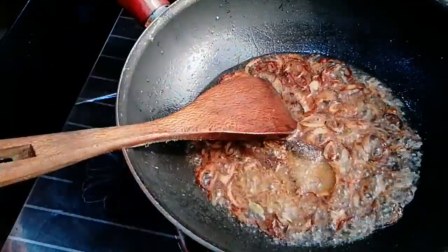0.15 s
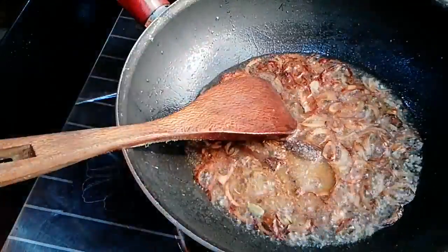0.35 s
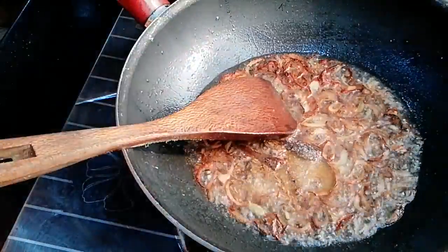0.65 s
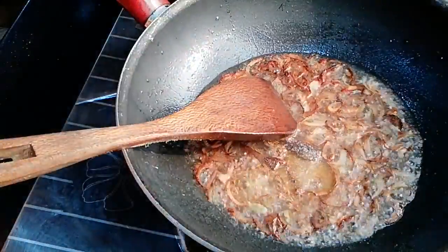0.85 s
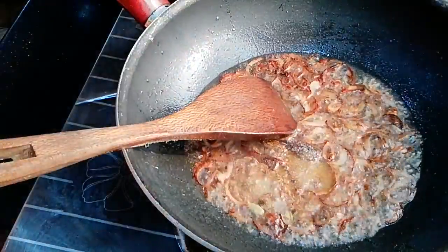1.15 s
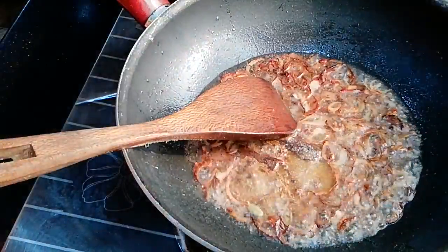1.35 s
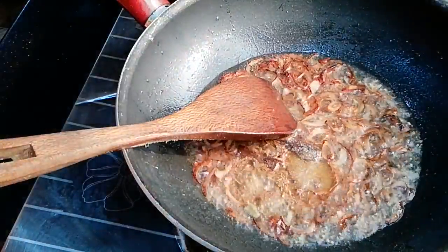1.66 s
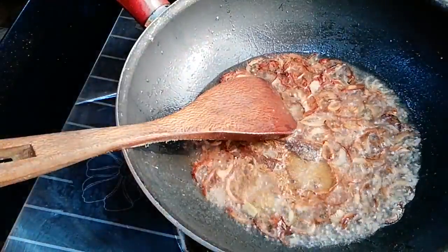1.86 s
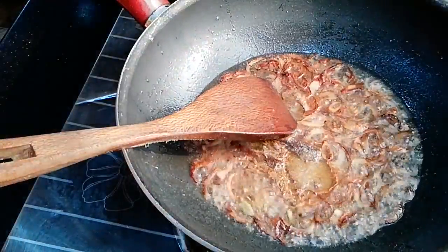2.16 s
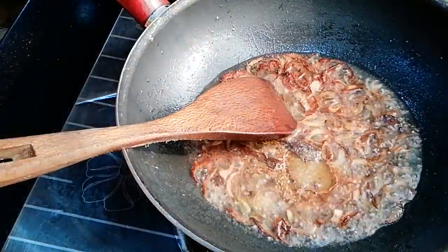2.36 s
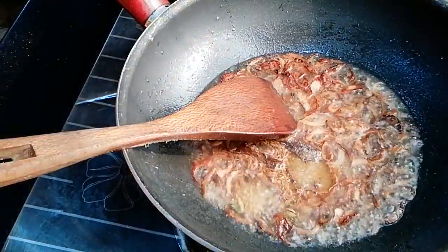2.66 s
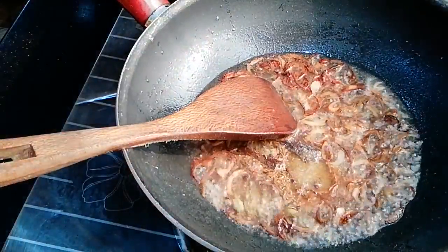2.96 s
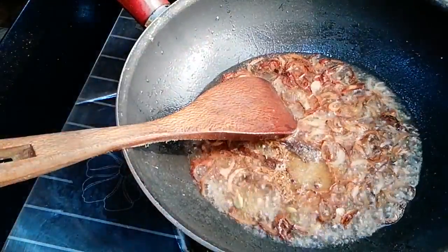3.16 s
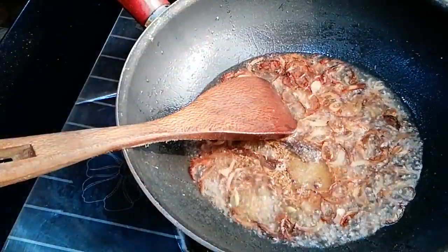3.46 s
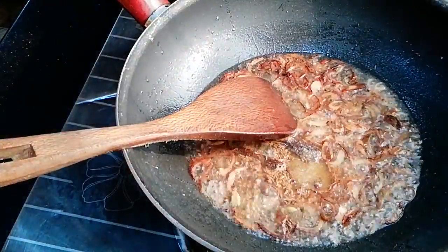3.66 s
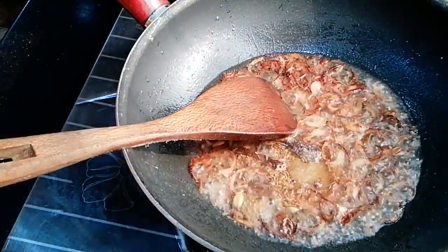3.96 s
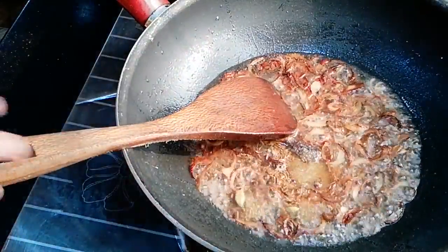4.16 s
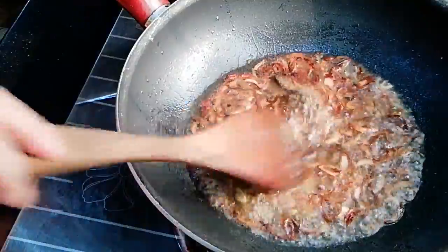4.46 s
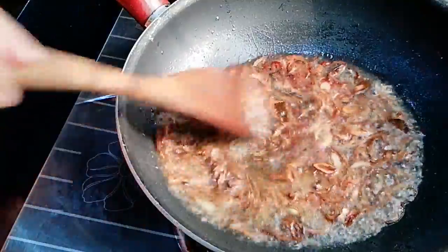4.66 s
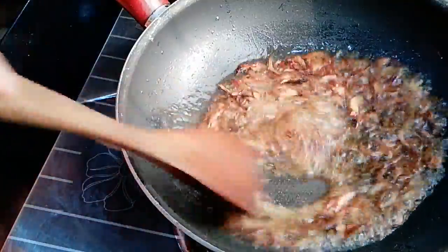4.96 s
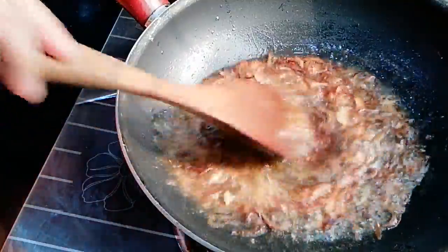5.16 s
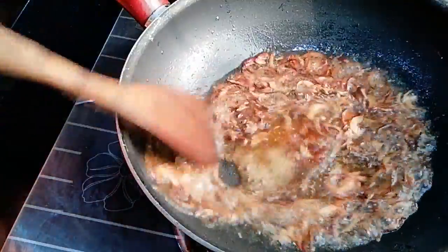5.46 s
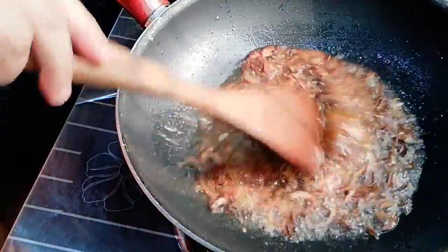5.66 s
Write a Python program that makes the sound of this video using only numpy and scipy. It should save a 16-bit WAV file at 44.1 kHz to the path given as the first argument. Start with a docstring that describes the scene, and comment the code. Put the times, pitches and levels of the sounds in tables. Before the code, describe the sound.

Close to the microphones, a wok sizzles and bubbles steadily, popping now and then over the low hum of a small kitchen. Early on, a plastic cup is put away slightly to the right, sliding and clattering briefly with a hollow, falling note. The boiling carries on alone until a wooden spatula scrapes gently through the onions three times, making the sizzle louder and brighter.

```python
"""A small kitchen with a low steady rumble, a pair of microphones on a wok of onions and spices.
They boil in a little water: thousands of tiny bubbles burst into a hiss, larger ones ring the bowl,
and a few spit. Early on a plastic cup is put away to one side: it scrapes, rattles and knocks home,
its hollow note falling. Later a spatula stirs and the hiss swells. Two soft bumps lie underneath."""
import sys
import numpy as np
from scipy import signal
from scipy.fft import rfft, irfft
from scipy.io import wavfile
from scipy.ndimage import uniform_filter1d

SR = 44100
rng = np.random.default_rng(int(sys.argv[2]) if len(sys.argv) > 2 else 0)


def put_to_file(sound):
    """Save the sound as 16-bit audio at rate SR, in the file named by the first command-line argument."""
    columns = np.atleast_2d(sound).T  # one column per channel
    safe = np.clip(columns, -1, 1)
    whole_steps = np.round(safe * 32767)
    wavfile.write(sys.argv[1], SR, whole_steps.astype(np.int16))


N = 255956
EDGE_HZ = 15900


def gain_of(db):
    """Decibels to gain."""
    return 10 ** (np.asarray(db) / 20)


def unit_rms(x):
    """Scales to rms 1."""
    return x / np.sqrt(np.mean(x ** 2) + 1e-20)


def since(start_s):
    """Seconds elapsed since a moment, zero before it."""
    return np.maximum(np.arange(N) / SR - start_s, 0)


def at_hz(points, hz):
    """Reads a spectrum on a log-frequency axis."""
    f, value = np.transpose(points)
    return np.interp(np.log(hz + 1), np.log(f), value)


def follow(points):
    """A curve in time, sample by sample."""
    return np.interp(since(0), *np.transpose(points))


def drift(span):
    """Random wander of rms 1 that changes within `span` samples."""
    wander = uniform_filter1d(rng.standard_normal(N), int(span), mode="wrap")
    return unit_rms(uniform_filter1d(wander - wander.mean(), int(span) // 3, mode="wrap"))


def add(mix, s, sound):
    """Adds a sound at time s."""
    part = mix[..., round(s * SR):][..., :sound.shape[-1]]
    part += sound[..., :part.shape[-1]]


def convolve(x, response):
    """Plays x through a response, one row a channel."""
    return signal.oaconvolve(np.atleast_2d(x), np.atleast_2d(response), axes=1)[:, :N]


def colour(x, points, size=4096):
    """Plays x through a causal filter of energy 1 with the given spectrum."""
    log_gain = np.log(gain_of(at_hz(points, abs(np.fft.fftfreq(size, 1 / SR)))))
    taps = np.fft.ifft(np.exp(np.conj(signal.hilbert(log_gain)))).real
    return convolve(x, taps / np.linalg.norm(taps))


def band(x, lo_hz, hi_hz, order):
    """Causal band-pass."""
    return signal.sosfilt(signal.butter(order, [lo_hz, hi_hz], "bandpass", fs=SR, output="sos"), x)


def resonate(x, hz, width):
    """A resonance that can follow a moving pitch; a unit click rings with height 1."""
    turn = np.exp(2j * np.pi * np.cumsum(hz * np.ones(N)) / SR)
    pole = np.exp(-np.pi * width / SR)
    return (turn * signal.lfilter([1], [1, -pole], x / turn + 1e-18)).imag


def burst(decay_s, rise_s, size=2048):
    """A contact and its scatter of near echoes, different at each microphone."""
    t = np.arange(size) / SR
    return np.exp(-t / decay_s) * (1 - np.exp(-t / rise_s)) * rng.standard_normal((2, size))


# The room around the microphones. Each row: frequency in Hz, seconds to die away by 60 dB.
KITCHEN_DECAY = [(300, 0.4), (1000, 0.4), (3000, 0.32), (8000, 0.35), (15000, 0.11)]
def kitchen(x, wet_db):
    """Adds a diffuse tail, different at each microphone, whose treble dies first."""
    hz, t, noise = signal.stft(rng.standard_normal((2, SR // 2)), SR, nperseg=256)
    decay = gain_of(-60 * t / at_hz(KITCHEN_DECAY, hz)[:, None])
    onset = 1 - np.exp(-t / 0.0011)
    tail = signal.istft(noise * decay * onset, SR, nperseg=256)[1]
    return x + gain_of(wet_db) * convolve(x, tail / np.linalg.norm(tail[0]))


def stirred(start_s=4.494, swell_s=0.27):
    """Stirring wets hot steel: how far it has roused the boil, 0 to 1."""
    return 1 - np.exp(-since(start_s) / swell_s)


def boil_db(recovery_db=2, recovery_s=2, stir_db=5.5):
    """Growth of the boil as the heat returns after fresh water, and with stirring."""
    return recovery_db * (1 - np.exp(-since(0) / recovery_s)) + stir_db * stirred()


def foam(fine_db, per_s=4600, spread_db=3.0, grain_width_hz=2500, clump_db=0.82, spurt_db=1.1, bands=13):
    """Bubbles of every pitch burst in loose clumps; each is a snap, echoes off the steel and some room."""
    popping = rng.random(N) < per_s / SR
    pitch = rng.uniform(0, EDGE_HZ, N)
    size = np.minimum(rng.exponential(1, N), 5)
    energy = popping * gain_of(spread_db * size + clump_db * drift(940)) ** 2
    t = np.arange(SR // 6) / SR
    # Snap, steel and room at the microphones. Each row: weight of energy, decay in seconds.
    paths = [(0.35, 0.000047), (0.41, 0.0011), (1.2, 0.016)]
    arrival = sum(weight * np.exp(-t / s) / s for weight, s in paths)
    hz, out = np.fft.rfftfreq(N, 1 / SR), np.zeros((2, N))
    noise = rfft(rng.standard_normal((2, N)))
    step = EDGE_HZ / (bands - 1)
    for centre in np.arange(bands) * step:
        power = abs(convolve(energy * np.exp(-((pitch - centre) / grain_width_hz) ** 2), arrival))
        noise_band = irfft(noise * np.maximum(1 - abs(hz - centre) / step, 0), N)
        # bubbles of one size come in spurts; the finest ones lift the top of the range
        lift_db = spurt_db * drift(1340) + fine_db * np.clip((centre - 7000) / 6000, 0, 1)
        out += noise_band * unit_rms(np.sqrt(power)) * gain_of(lift_db)
    return out


# Bursting foam in the wok. Each row: frequency in Hz, relative density in dB.
HISS_SPECTRUM = [(400, -31), (900, -14), (1700, -4.5), (2450, -6), (3150, -2), (4400, -1.5), (5700, -1.5),
                 (7200, -2), (8000, 1.5), (8700, 0.5), (9600, -0.4), (11000, -6.5), (13000, -11.5),
                 (15800, -16.5)]
def hiss(level_db=-39, waver_db=0.39, waver_s=0.11, flash_s=4.66, rise_s=0.082, fall_s=0.12):
    """The foam's sizzle wavers a little; stirring swells it and brings a brief flash of treble."""
    t = since(flash_s)
    flash = np.minimum(t / rise_s, 1) * np.exp(-np.maximum(t - rise_s, 0) / fall_s)
    fizz = colour(foam(fine_db=3 * stirred() + 10.5 * flash), HISS_SPECTRUM)
    return gain_of(level_db + boil_db() - 0.1 * flash + waver_db * drift(waver_s * SR)) * unit_rms(fizz)


# Resonances of the wok's bowl. Each row: pitch in Hz, width in Hz, relative gain in dB.
BOWL_MODES = [(432, 7.5, -36), (684, 61, -6.5), (876, 117, -10), (1194, 103, -0.5), (1440, 193, -5),
              (1930, 224, -8.5)]
# The larger bubbles slowly come and go. Each row: time in seconds, level in dB.
GURGLE_LEVELS = [(.4, -47.5), (.7, -48), (2.0, -48.5), (2.6, -46.7), (4.15, -49.5), (4.55, -48),
                 (5.0, -47.5), (5.25, -44.5), (5.8, -48.5)]
def gurgle(per_s=900, spread_db=3.0, crossfeed=0.18, surge_db=1.7):
    """Larger bubbles come in little surges and ring the air in the bowl of the wok."""
    popping = rng.random((2, N)) < per_s / SR
    size = np.minimum(rng.exponential(1, (2, N)), 4)
    clicks = popping * gain_of(spread_db * size) * rng.choice([-1, 1], (2, N))
    clicks = kitchen(clicks, wet_db=-0.5)
    clicks = clicks + crossfeed * clicks[::-1]
    # each surge favours other resonances, according to where it breaks
    ring = sum((-1) ** k * gain_of(db + surge_db * drift(2100)) * width * resonate(clicks, hz, width)
               for k, (hz, width, db) in enumerate(BOWL_MODES))
    return gain_of(follow(GURGLE_LEVELS)) * unit_rms(ring)


# The kitchen's room tone. Each row: frequency in Hz, relative density in dB.
RUMBLE_SPECTRUM = [(20, -14), (48, -12.5), (66, -9.5), (80, -7), (98, -0.5), (120, -4), (170, -8),
                   (210, -6.5), (260, -10.5), (350, -9), (500, -14.5), (900, -12), (2000, -33)]
# How alike it is at the two microphones. Each row: frequency in Hz, correlation from -1 to 1.
RUMBLE_LIKENESS = [(60, 1), (160, 1), (260, 0.94), (420, -0.15), (750, -0.44)]
def rumble(level_db=-48.5):
    """Steady low noise of stove and room, its bass nearly the same at both microphones."""
    hz = np.fft.rfftfreq(N, 1 / SR)
    left, other = rfft(rng.standard_normal((2, N)))
    likeness = at_hz(RUMBLE_LIKENESS, hz)
    right = likeness * left + np.sqrt(1 - likeness ** 2) * other
    spectrum = np.array([left, right]) * gain_of(at_hz(RUMBLE_SPECTRUM, hz))
    return gain_of(level_db) * unit_rms(irfft(spectrum, N))


# The main spits from the wok. Each row: start in seconds, level in dB.
LOUD_SPITS = [(.1345, -19), (.4825, -17.5), (1.0045, -20.5), (1.4162, -18.5), (1.843, -18), (1.912, -19),
              (1.9845, -19), (2.385, -20), (2.4515, -25), (3.3793, -21), (3.6509, -17), (3.757, -17),
              (3.982, -15), (4.3458, -16), (4.6234, -15), (4.913, -12), (4.944, -16), (5.163, -20),
              (5.282, -13), (5.4018, -11)]
# The snap of one spit. Each row: frequency in Hz, relative density in dB.
SNAP_SPECTRUM = [(500, -32), (2000, -24), (4000, -8), (8500, 6.5), (11000, -2), (15500, -12)]
def spits(small_per_s=7, small_db=-22.5, spread_db=1, max_count=80):
    """Sharp spits stand out of the foam; the lesser ones come at random and grow with the boil."""
    out, lift_db = np.zeros((2, N)), boil_db()
    times = np.cumsum(rng.exponential(1 / small_per_s, max_count))
    levels = small_db + spread_db * rng.standard_normal(max_count)
    small = [(s, db + lift_db[int(s * SR)]) for s, db in zip(times, levels) if s < N / SR]
    for s, db in LOUD_SPITS + small:
        snap = burst(decay_s=.0011, rise_s=.0002)
        add(out, s, gain_of(db) * snap / abs(snap).max())
    return kitchen(colour(out, SNAP_SPECTRUM), wet_db=-4)


# Bumps, alike at both microphones. Each row: start in seconds, level in dB, pitch in Hz.
LOW_BUMPS = [(0.384, -40, 57.3), (5.06, -47, 42)]
def bumps(t60=.3, rise_s=.008):
    """Two soft bumps, each a very low tone that dies quickly."""
    t, out = np.arange(SR // 3) / SR, np.zeros(N)
    for s, db, hz in LOW_BUMPS:
        envelope = gain_of(db - 60 * t / t60) * (1 - np.exp(-t / rise_s))
        add(out, s, envelope * np.sin(2 * np.pi * hz * t))
    return out


# The cup knocks, off to one side. Each row: start in seconds, then ring, clack and crack levels in dB.
CUP_BLOWS = [(.7360, -28, -25, -48), (.7410, -18.5, -29.5, -49), (0.883, -32, -31, -52),
             (0.9168, -16.5, -33, -43), (1.022, -19, -23, -23), (1.0805, -21, -18, -14),
             (1.1079, -15, -16.5, -11), (1.1305, -3.5, -13, -14), (1.1342, -9.5, -20.5, -8.5),
             (1.1730, -12.5, -22.5, -20)]
def cup_blows(contact_s=.0042):
    """Each blow gives a push to the air under the cup, a dull clack and a sharp crack."""
    pushes, clacks, cracks = np.zeros(N), np.zeros((2, N)), np.zeros((2, N))
    for s, ring_db, clack_db, crack_db in CUP_BLOWS:
        add(pushes, s, gain_of([ring_db]))
        add(clacks, s, gain_of(clack_db) * burst(contact_s, rise_s=0.0006))
        add(cracks, s, gain_of(crack_db) * burst(contact_s, rise_s=0.0015))
    return pushes, clacks, cracks


# The cup slides between knocks. Each row: start in seconds, length in seconds, level in dB.
CUP_SLIDES = [(.742, 0.064, -50), (0.873, .10, -41), (1.016, 0.097, -31), (1.089, 0.054, -30.5)]
def cup_rubbing(bite_s=0.0088, ease_db_per_s=-33, release_s=0.019, grip_db=4.0):
    """Strength of the rubbing: each slide bites, eases off and lets go; the rim grips unevenly."""
    rub = np.zeros(N)
    for s, length, db in CUP_SLIDES:
        bite = np.minimum(since(s) / bite_s, 1)
        release = np.exp(-since(s + length) / release_s)
        rub += bite * gain_of(db + ease_db_per_s * since(s)) * release
    return rub * gain_of(grip_db * drift(100))


# The note of the air under the cup. Each row: time in seconds, pitch in Hz.
CUP_AIR_NOTE = [(.742, 870), (.755, 1420), (.78, 1530), (.92, 1640), (.98, 1600), (1.03, 1360),
                (1.09, 1220), (1.135, 930), (1.25, 930)]
def cup_air(pushes, rub, width_hz=150, hollow_db=-1):
    """Blows and rubbing ring the air under the cup; its note rises, then falls as the gap closes."""
    hz = follow(CUP_AIR_NOTE)
    hollow = resonate(rng.standard_normal(N), hz, width=160)
    hollow = unit_rms(resonate(hollow, hz, width=600))
    air = resonate(pushes, hz, width_hz) + gain_of(hollow_db) * rub * hollow
    return air * gain_of([[-2], [.5]])  # toward the right microphone


# The cup's plastic wall. Each row: pitch in Hz, relative gain in dB, seconds to die away by 60 dB.
SHELL_MODES = [(746, -1.5, 0.11), (855, -7, 0.44), (920, -2, .35), (970, 3, 0.54), (1210, -8, 0.6),
               (1317, 2.5, .25), (1620, 1, 0.14), (2580, 15, 0.062), (7640, 4, 0.014), (9600, -3, .015)]
def cup_shell(body, level_db=-4):
    """The shell rings on wherever the sliding note meets one of its modes."""
    ring = 0
    for hz, db, t60 in SHELL_MODES:
        width = np.log(1000) / np.pi / t60
        ring += gain_of(db + level_db) * 2 * np.pi * width / SR * resonate(body, hz, width)
    return ring


def cup_thud(start_s=1.174, level_db=-31, hz=573, width_hz=80):
    """The cup's last bounce thuds on the surface below."""
    t = since(start_s)
    return gain_of(level_db) * np.exp(-np.pi * width_hz * t) * np.sin(2 * np.pi * hz * t)


# The clack of a blunt contact and the crack of plastic. Each row: frequency in Hz, relative density in dB.
CLACK_SPECTRUM = [(300, -10), (600, 4), (1700, 2), (2050, -4.5), (2900, -1), (3600, 0), (5000, -22),
                  (15000, -17)]
CRACK_SPECTRUM = [(300, 0), (550, -12), (800, -16), (2000, -29), (4000, -8.5), (6000, -4), (7700, -0.5),
                  (8300, -6.5), (9400, -1.5), (11000, -9.5), (15500, -22)]
def cup(rasp_db=-14, scratch_db=-13):
    """The cup knocks and scrapes home, ringing its air, its shell and the kitchen."""
    pushes, clacks, cracks = cup_blows()
    rub = cup_rubbing()
    clacks += gain_of(rasp_db) * rub * rng.standard_normal((2, N))
    cracks += gain_of(scratch_db) * rub * rng.standard_normal((2, N))
    body = cup_air(pushes, rub) + colour(clacks, CLACK_SPECTRUM) + colour(cracks, CRACK_SPECTRUM)
    body = band(body, 940, 20000, order=4)  # so small a thing radiates no bass
    return kitchen(body + cup_shell(body) + cup_thud(), wet_db=-3.0)


# The spatula in the wok. Each row: start in seconds, length in seconds, level in dB.
SPATULA_STROKES = [(4.553, .2, -46.5), (4.95, 0.29, -45.5), (5.327, 0.36, -48)]
# What its scraping rings. Each row: pitch in Hz, width in Hz, relative gain in dB.
SCRAPE_MODES = [(1170, 230, -6), (1510, 170, 1.5), (1850, 190, 1)]
def spatula(slip_db=3):
    """Wood slips unevenly over wet steel and rings the bowl; each stroke speeds up and slows in an arch."""
    speed = sum(gain_of(db) * np.sin(np.pi * np.minimum(since(s) / length, 1))
                for s, length, db in SPATULA_STROKES)
    slips = rng.standard_normal((2, N)) * gain_of(slip_db * drift(300))
    ring = sum((-1) ** k * gain_of(db) * width * resonate(slips, hz, width)
               for k, (hz, width, db) in enumerate(SCRAPE_MODES))
    scrape = speed * unit_rms(band(ring, 820, 2800, order=2))
    return scrape * gain_of([[-2], [1.5]])  # toward the right microphone


# The wok's place between the microphones. Each row: frequency in Hz, left minus right in dB.
WOK_BALANCE = [(300, -18), (700, -2), (1290, 0.5), (2400, -2), (3300, -4), (5500, -2), (8400, 0.7),
               (10500, -2.5), (15000, -6)]
def wok():
    """All sounds of the wok, a little stronger at the right microphone."""
    sound = hiss() + gurgle() + spits() + spatula()
    side_db = at_hz(WOK_BALANCE, np.fft.rfftfreq(N, 1 / SR))
    return irfft(rfft(sound) * gain_of([side_db / 2, -side_db / 2]), N)


def scene():
    """The boiling wok, the cup and the room."""
    return wok() + cup() + rumble() + bumps()


def record(dry):
    """The recorder's band limit."""
    lowpass = signal.firwin(511, EDGE_HZ, window=("kaiser", 9), fs=SR)
    return signal.oaconvolve(dry, lowpass[None], "same")


dry = scene()
out = record(dry)
put_to_file(out)
```